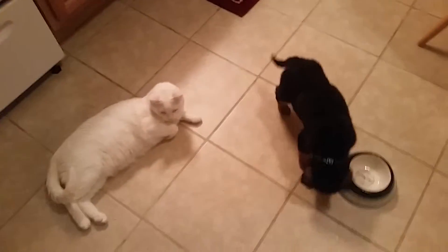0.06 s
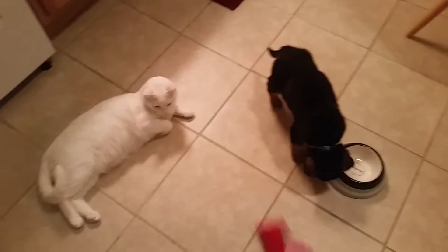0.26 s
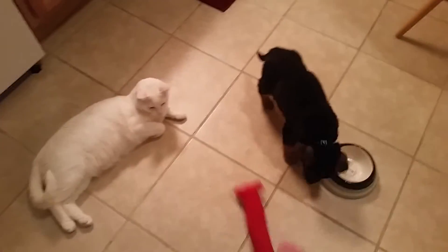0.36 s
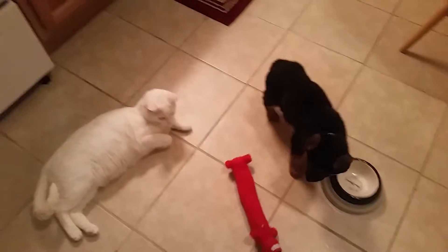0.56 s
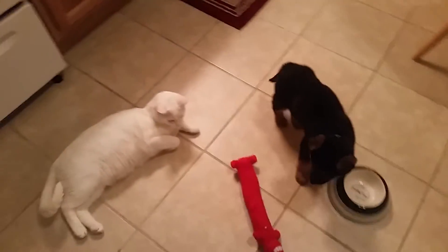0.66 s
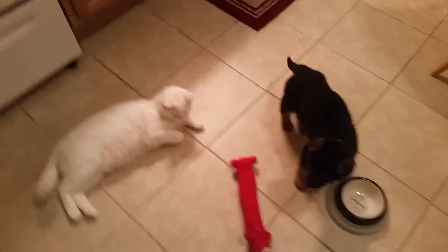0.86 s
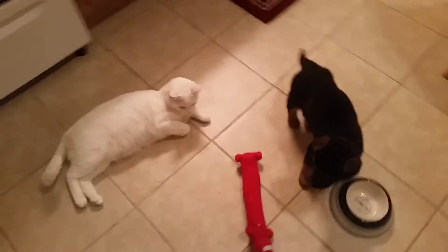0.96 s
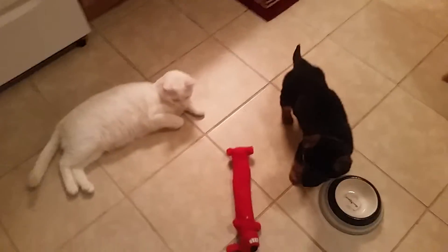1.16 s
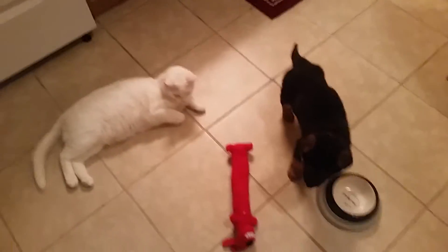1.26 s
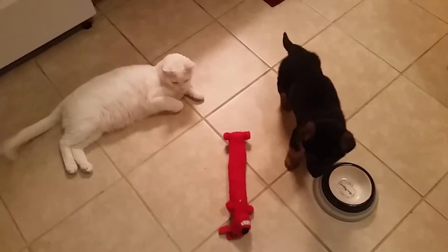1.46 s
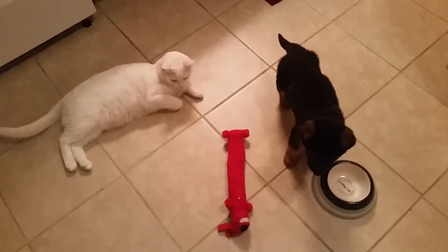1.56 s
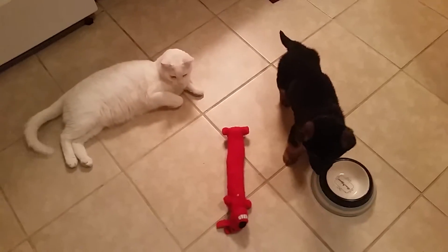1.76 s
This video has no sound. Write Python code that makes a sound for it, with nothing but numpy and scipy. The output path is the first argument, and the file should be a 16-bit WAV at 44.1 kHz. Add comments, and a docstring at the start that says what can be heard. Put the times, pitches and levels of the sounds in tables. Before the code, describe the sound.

A single puppy yip breaks up into a squeal and falls back hoarsely, just after two soft bumps. The tiled kitchen echoes briefly, then a hand-held phone catches only a quiet appliance hum and more dull bumps.

```python
"""An appliance hums and two soft bumps sound; almost at once a puppy gives one sharp yip, a bit to the right.
Its vocal folds (the flaps in its throat that make the voice) start low, break upward into a whistle
and fall back hoarsely. Throat and mouth colour the sound, and the tiled kitchen rings after it.
The hum goes on, with more low bumps and a trace of high hiss. A hand-held phone picks it all up."""
import sys
import numpy as np
from scipy import signal
from scipy.fft import rfft, irfft
from scipy.io import wavfile
from scipy.ndimage import uniform_filter1d

SR = 44100
rng = np.random.default_rng(int(sys.argv[2]) if len(sys.argv) > 2 else 0)


def store_pcm(level_fs):
    """Save levels as 16-bit WAV."""
    pcm = np.round(np.clip(level_fs, -1, 1) * 32767).astype(np.int16)
    wavfile.write(sys.argv[1], SR, np.atleast_2d(pcm).T)


N = 79380

# how the voice moves: t/s, f/Hz, level/dB, roughness/0-1, brightness/(dB per octave)
YIP_PATH = [(0.241, 368.1, -25.5, 0.14, -6), (.254, 415.4, -23.5, .08, -14), (.261, 580.2, -23, 0.48, -3),
            (.268, 1029, -16, 0.1, -10), (.275, 1058, -22.5, 0.6, 1), (.279, 1947, -22.5, 0.49, -4),
            (.288, 2231, -26.5, 0.44, -4), (.293, 2889, -24.5, 0.21, -15.5), (.308, 2796, -31.5, .2, -1),
            (.316, 2675, -26, 0.18, -7.5), (.321, 2037, -19.5, 0.3, -4), (.335, 1760, -25.5, 0.2, 2),
            (.346, 1555, -24.5, 0.44, 1), (.350, 906.5, -22, 0.42, -2), (.361, 717.4, -20, 0.05, -4),
            (.369, 468.5, -21.5, 0.09, -1.5), (.381, 423.9, -29, 0.03, 1.5), (.414, 402.5, -31, 0.07, -0.5),
            (0.437, 372, -37.5, .02, -7), (0.453, 354, -34.5, 0.1, -16)]
# pitch ranges that throat and mouth favour: f/Hz, width/Hz, relative level/dB
THROAT_PEAKS = [(410, 420, -11), (789, 126, -9), (1073, 255, -0.5), (1492, 810, 0), (2800, 2650, -15),
                (3610, 740, -11), (5044, 770, -10.5), (6980, 630, -14), (8600, 2000, -33),
                (10470, 1130, -15.5), (11450, 720, -23)]
# the mouth's main peak, rising as the jaw opens and sinking as it closes: t/s, f/Hz
MOUTH_PATH = [(.241, 1150), (.272, 1080), (.285, 2100), (.325, 2000), (.35, 1450), (.375, 1480),
              (.412, 1630), (.453, 1460)]
# a second, lower tone that the folds hold under the whistle: t/s, f/Hz, level/dB
UNDERTONE_PATH = [(.268, 1050, -42), (.277, 1075, -30), (.293, 1055, -33), (.300, 1060, -48),
                  (.321, 1050, -48), (.327, 990, -25), (.337, 955, -37)]
# how long the kitchen rings: f/Hz, time to fade by 60 dB/s
ROOM_FADE = [(300, .58), (950, .39), (1300, .45), (1600, .55), (2200, .5), (4000, .58), (7000, .4),
             (9000, .46), (11000, .68)]
# how much louder the yip is on the left than on the right: f/Hz, level/dB
YIP_PAN = [(60, 32), (110, 34), (200, 4), (380, -5), (700, 3), (1290, -8.5), (2380, -10), (4400, -15.5),
           (8120, 12.5), (15000, 4)]
# soft low bumps: t/s, level/dB, f/Hz, time to fade by 60 dB/s
LOW_BUMPS = [(0.091, -35.5, 160, 0.058), (0.127, -27.5, 113, 0.017), (0.325, -33.5, 122, 0.085),
             (0.463, -43, 145, 0.2), (0.626, -33, 160, 0.037), (0.733, -35.5, 125.4, 0.09),
             (0.997, -40.5, 131, 0.17), (1.046, -29.5, 71, 0.063), (1.244, -44, 100, 0.1),
             (1.285, -32, 73, 0.034), (1.335, -33, 78, 0.042), (1.617, -21, 97, 0.031)]
# the appliance's motor and mains tones: f/Hz, level/dB
HUM_TONES = [(118.4, -57.5), (209.9, -63), (296.1, -60.5), (360.7, -64), (446.8, -67), (586.8, -64),
             (662, -66.5)]
# the colour of the rushing air: f/Hz, relative level/dB
AIR_COLOUR = [(25, -24), (60, -8), (110, -7), (200, -12), (350, -11), (620, -9.5), (900, -15), (1400, -20),
              (2700, -22), (3400, -31), (5000, -31), (6200, -51.5), (9400, -56.5), (10300, -47.5),
              (15500, -49)]
# how alike the air sounds in both ears: f/Hz, likeness/0-1
AIR_ALIKE = [(60, 0.72), (300, 0.88), (1000, 0.28), (4000, 0.088), (12000, 0.042)]
# how much louder the air is on the left than on the right: f/Hz, level/dB
AIR_PAN = [(60, -10), (200, -2), (700, -3.5), (1290, -2.5), (2380, -7.5), (4400, -13.5), (8120, 4.5),
           (15000, 1.5)]
# faint high hisses: t/s, half length/s, level/dB
HISS_SWELLS = [(0.61, 0.05, -65), (.855, 0.011, -72.5), (0.5, 0.32, -70)]

TOP_HZ = 15700  # upper limit for the voice and the phone


def yip(lower_tone):
    """The vocal folds chop the breath into uneven puffs, which ring through the throat and mouth."""
    jitter, shimmer, weak_pulse = .058, .95, .63  # unevenness of pitch, loudness and every other puff
    rasp_rad, rasp_hz, bright_hz = 1.72, 5150, 1810
    mouth_peak_db, mouth_width_hz, breath_db, shake_db = 3, 300, -7, 18.5
    attack_s, release_s = .0033, .011
    t = times()
    at, *columns = np.array(YIP_PATH).T
    pitch, db, rough, bright = (np.interp(t, at, column) for column in columns)
    mouth_hz = np.interp(t, *np.array(MOUTH_PATH).T)
    hz = pitch * (1 + jitter * rough * (wander(350) + wander(1824)))
    phase = 2 * np.pi * np.cumsum(hz) / SR
    folds = 0
    for k in range(1, 41):  # overtones: whole multiples of the pitch
        overtone_hz = k * hz
        rasp = rasp_rad * np.sqrt(rough) * overtone_hz / rasp_hz * wander(960)  # high ones lose step
        tilt_db = bright * np.log2(np.maximum(overtone_hz / bright_hz, 1))
        mouth_db = mouth_peak_db / (1 + (2 * (overtone_hz - mouth_hz) / mouth_width_hz) ** 2)
        top_fade = np.clip((TOP_HZ - overtone_hz) / bright_hz, 0, 1)
        folds += np.cos(k * phase + rasp) * undb(tilt_db + mouth_db) * top_fade
    folds *= np.sqrt(2 * hz / TOP_HZ)  # makes up for high notes having fewer overtones
    folds *= 1 + shimmer * rough * wander(900)
    folds *= 1 + weak_pulse * rough * np.cos(phase / 2)
    folds *= 1 + undb(shake_db) * lower_tone  # the lower tone shakes the whistle
    breath = undb(breath_db) * rough * (1 + np.cos(phase)) * rng.standard_normal(N)
    voice = throat(folds + breath)
    voice /= np.sqrt(uniform_filter1d(voice ** 2, size=300) + 1e-12)  # even out the loudness
    fade_in = np.clip((t - at[0]) / attack_s, 0, 1)
    fade_out = np.clip(1 - (t - at[-1]) / release_s, 0, 1)
    return voice * undb(db) * fade_in * fade_out


def throat(x):
    """The air in the throat and mouth rings on after each puff."""
    f = freqs()
    gain = sum(undb(db) / (1 + ((f * f - hz * hz) / (f * width)) ** 2) for hz, width, db in THROAT_PEAKS)
    cepstrum = irfft(np.log(gain + 1e-4), N)  # the filter's shape, laid out in time
    after_only = 1 + np.sign(np.fft.fftfreq(N))  # no ringing ahead of a puff
    return shape(x, np.exp(rfft(cepstrum * after_only)))


def undertone():
    """A second, nearly pure vibration of the folds comes and goes under the whistle."""
    t = times()
    at, hz, db = np.array(UNDERTONE_PATH).T
    pitch = np.interp(t, at, hz) * (1 + .02 * wander(280))
    loudness = uniform_filter1d(np.interp(t, at, undb(db), left=0, right=0), size=200)
    return np.sqrt(2) * np.sin(2 * np.pi * np.cumsum(pitch) / SR) * loudness


def kitchen(x):
    """Sound arrives directly, then as echoes off floor and cupboards, then as a blurred ring."""
    first_wall_s, build_s, ring_db = .008, .026, -4.2
    echo_count, echo_span_s, echo_db = 14, .07, -11
    t, f = times(), freqs()
    fade_s, ring = over_hz(ROOM_FADE), 0
    noise = rng.standard_normal((2, N))
    for octave in np.arange(6, 14.1, 1 / 3):  # each third of an octave fades at its own speed
        band = np.clip(1 - 3 * abs(np.log2(f) - octave), 0, 1)
        ring += shape(noise, band) * die_away(t, np.interp(2. ** octave, f, fade_s))
    ring *= np.clip((t - first_wall_s) / build_s, 0, 1)
    response = undb(ring_db) * unit(ring) / np.sqrt(N)
    response[:, 0] += 1  # the direct sound
    for lateness, left, right in rng.random((echo_count, 3)):
        lags = SR * (first_wall_s + lateness * echo_span_s + .0012 * np.array([left, right]))
        response[[0, 1], lags.astype(int)] += undb(echo_db) * 2 * (1 - lateness) / np.sqrt(echo_count)
    in_room = signal.fftconvolve(x[None], response, axes=1)[:, :N]
    return shape(in_room, pan(over_hz(YIP_PAN)))


def bumps():
    """Each bump is a fast-fading low thud with a shorter knock on top; the room booms briefly after."""
    knock_hz, knock_db, attack_s, boom_db = 209, -13.5, .00011, -10.5
    t, hits = times(), 0
    for at, db, hz, fade_s in LOW_BUMPS:
        age = np.maximum(t - at, 0)
        fade = die_away(age, fade_s)
        thud = np.sin(2 * np.pi * hz * age) * fade
        knock = undb(knock_db) * np.sin(2 * np.pi * knock_hz * age) * fade ** 2
        hits += undb(db) * (thud + knock) * (1 - np.exp(-age / attack_s))
    ring = unit(rng.standard_normal(N) * die_away(t, fade_s=.31)) / np.sqrt(N)
    boom = undb(boom_db) * signal.fftconvolve(hits, ring)[:N]
    return (hits + boom) * pan(db=-18.5)


def appliance():
    """Air rushes steadily while the motor and mains tones waver a little."""
    air_db, waver = -50, .032
    alike, colour = over_hz(AIR_ALIKE), undb(over_hz(AIR_COLOUR))
    shared = shape(rng.standard_normal(N), colour * np.sqrt(1 + alike))
    opposed = shape(rng.standard_normal(N), colour * np.sqrt(1 - alike))
    air = np.array([shared + opposed, shared - opposed]) / np.std(shared)
    hum = 0
    for hz, db in HUM_TONES:
        loudness = undb(db) * np.sqrt(2) * (1 + waver * wander(11))
        hum += loudness * np.sin(2 * np.pi * (hz * times() + rng.random()) + waver * wander(39))
    return undb(air_db) * shape(air, pan(over_hz(AIR_PAN))) + hum * pan(db=-1.5)


def hisses():
    """Thin, very high hiss swells and fades."""
    centre_hz, half_width_octaves = 11100, .17
    swell = sum(undb(db) * np.exp(-((times() - at) / half) ** 2) for at, half, db in HISS_SWELLS)
    band = 1 / (1 + (np.log2(freqs() / centre_hz) / half_width_octaves) ** 2)
    return swell * unit(shape(rng.standard_normal((2, N)), band)) * pan(db=5.5)


def undb(db):
    """Turn decibels into a multiplier."""
    return 10 ** (np.asarray(db) / 20)


def unit(x):
    """Scale to an average power of 1."""
    return x / np.sqrt(np.mean(x ** 2))


def times():
    """The time of every sample, in seconds."""
    return np.arange(N) / SR


def freqs():
    """The frequencies a filter works on, in Hz."""
    return np.maximum(np.arange(N // 2 + 1) * SR / N, 1)


def over_hz(table):
    """Join a table's (frequency, value) points, spacing the octaves evenly."""
    hz, value = np.array(table, float).T
    return np.interp(np.log(freqs()), np.log(hz), value)


def shape(x, gain):
    """Filter a sound: multiply each frequency by its own gain."""
    return irfft(rfft(x) * gain, N)


def pan(db):
    """Left and right gains; positive db makes the left louder."""
    gain = undb(np.array([[1], [-1]]) * db / 2)
    return gain / np.sqrt(np.mean(gain ** 2, axis=0))


def wander(rate_hz):
    """A smooth random wobble with a typical size of 1."""
    span = max(int(SR / rate_hz), 2)
    return unit(uniform_filter1d(uniform_filter1d(rng.standard_normal(N), span), span))


def die_away(age, fade_s):
    """A fade that drops 60 dB in fade_s seconds."""
    return np.exp(-np.log(1000) * age / fade_s)


def scene():
    """The yip rings in the kitchen over the hum, the bumps and a trace of hiss."""
    lower_tone = undertone()
    return kitchen(yip(lower_tone) + lower_tone) + appliance() + bumps() + hisses()


def record(dry):
    """The phone's two microphones lie a little apart; it cuts the deepest bass and the highest treble."""
    right_lag_s, low_cut_hz = .00024, 44.4
    apart = shape(dry, np.exp(-2j * np.pi * freqs() * np.array([[0], [right_lag_s]])))
    thin = signal.sosfilt(signal.butter(2, low_cut_hz, "high", fs=SR, output="sos"), apart)
    return signal.sosfilt(signal.ellip(10, .2, 80, TOP_HZ, fs=SR, output="sos"), thin)


dry = scene()
out = record(dry)
store_pcm(out)
```